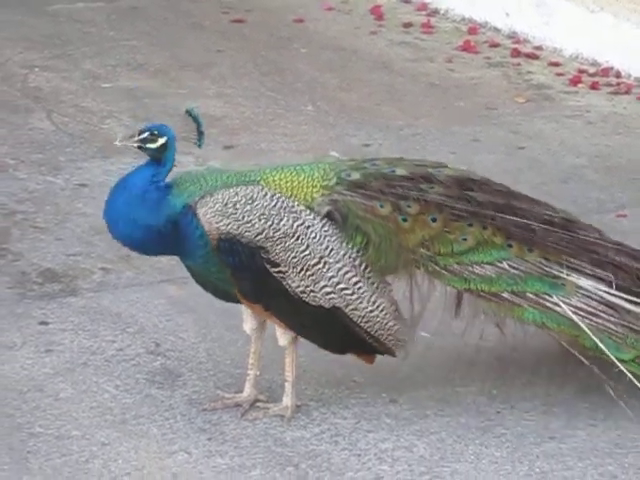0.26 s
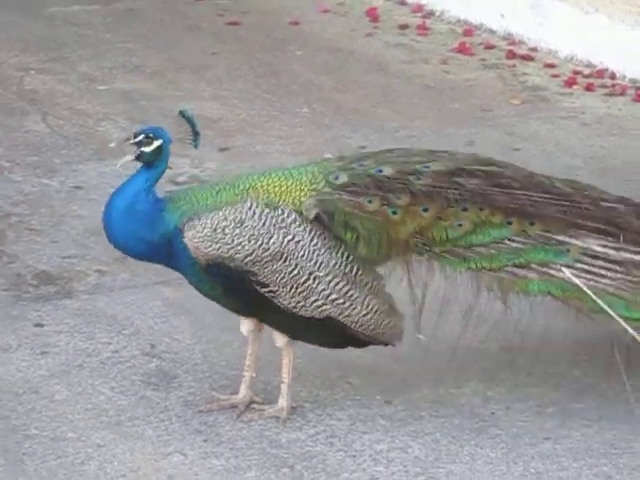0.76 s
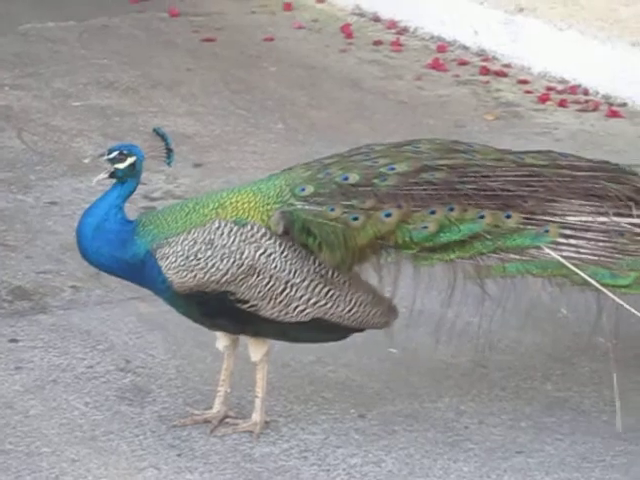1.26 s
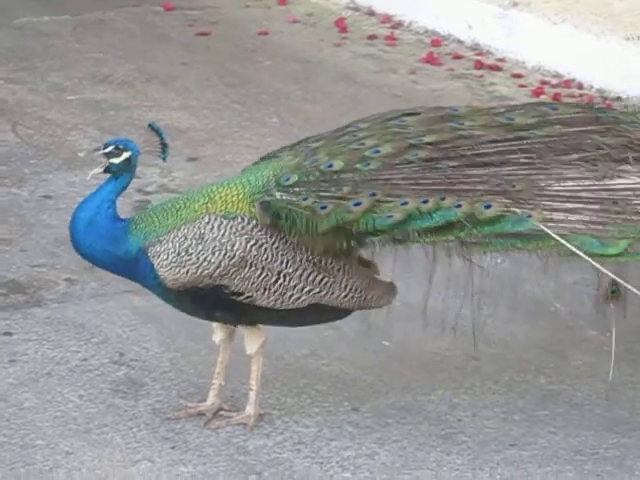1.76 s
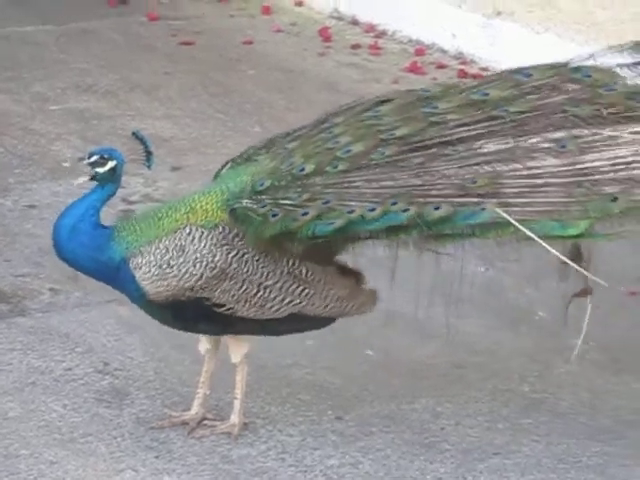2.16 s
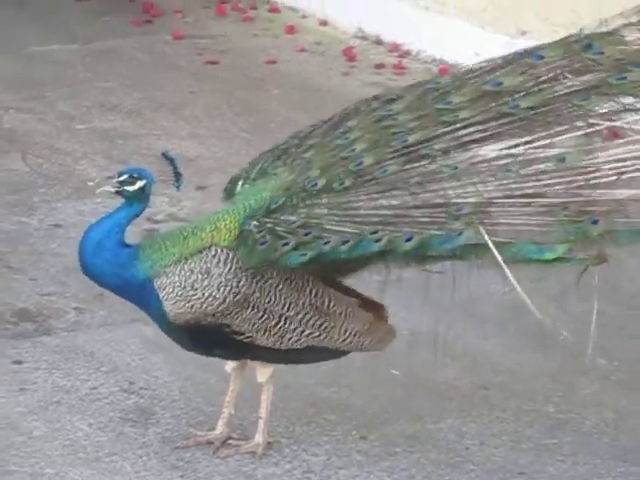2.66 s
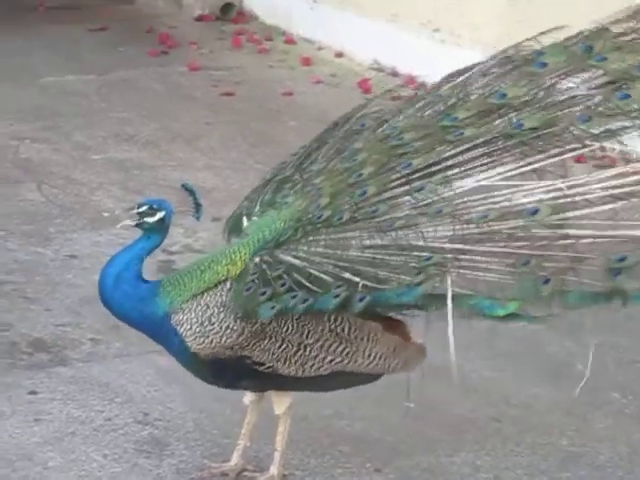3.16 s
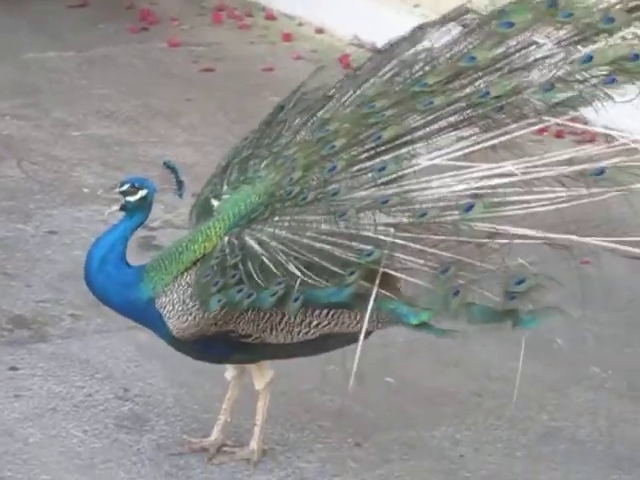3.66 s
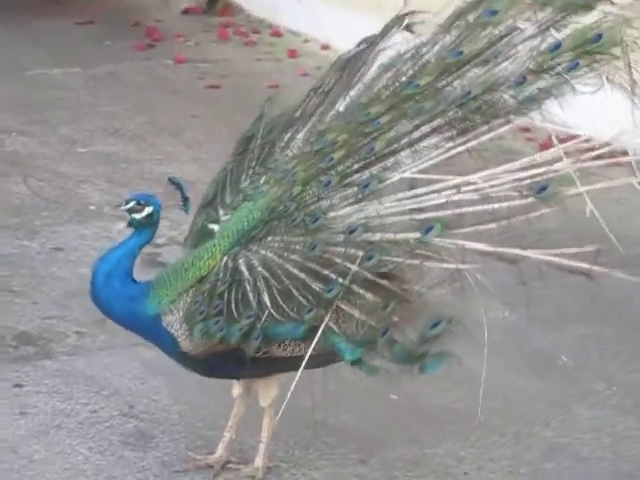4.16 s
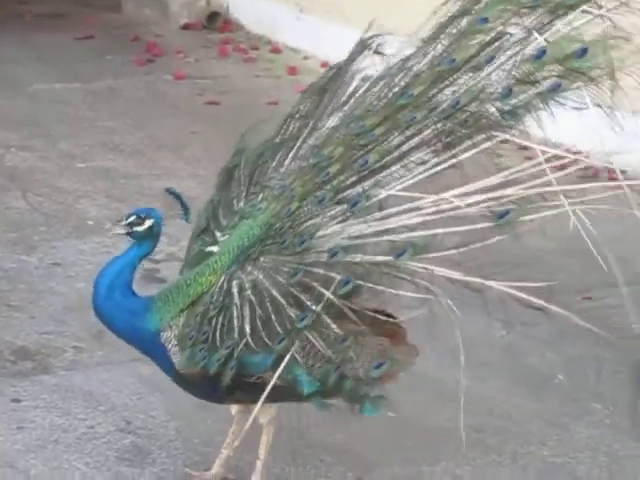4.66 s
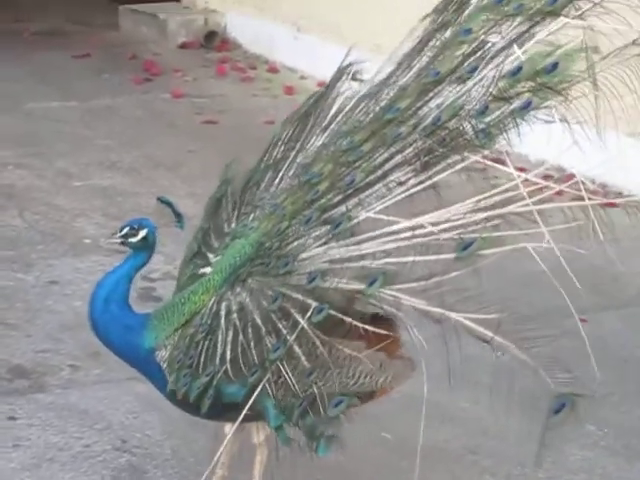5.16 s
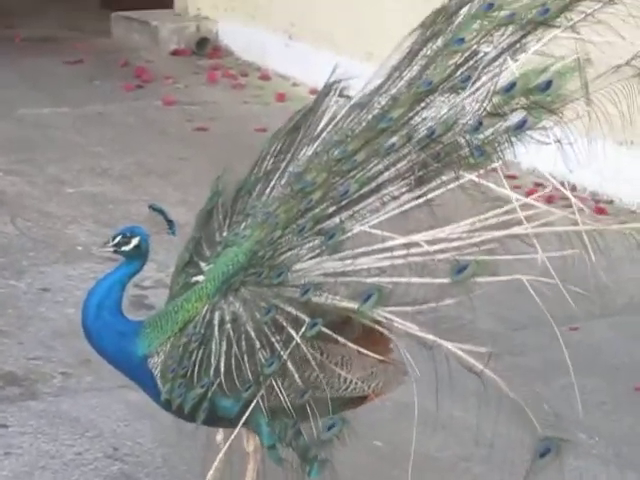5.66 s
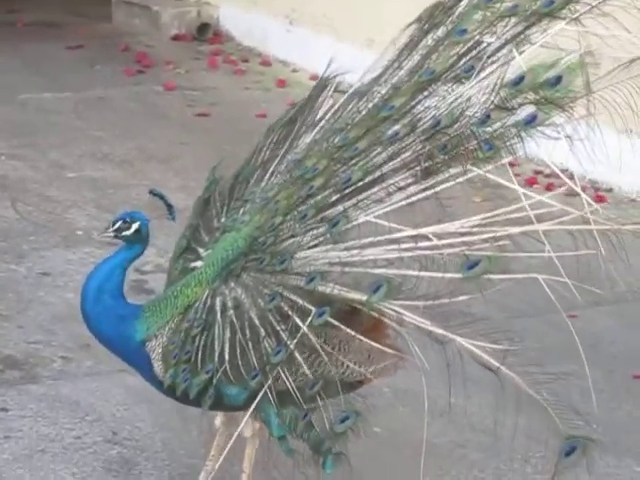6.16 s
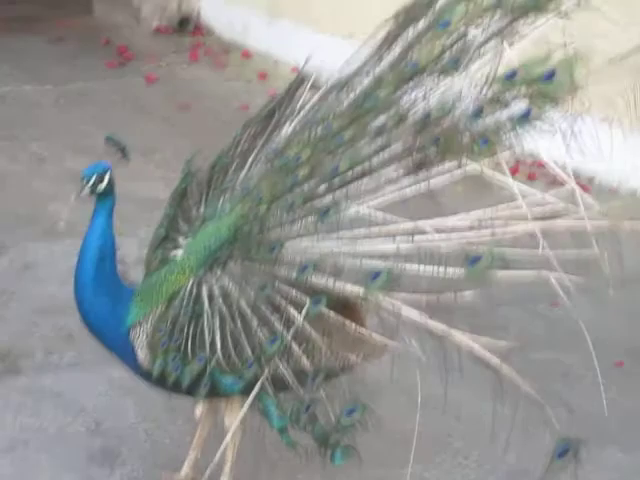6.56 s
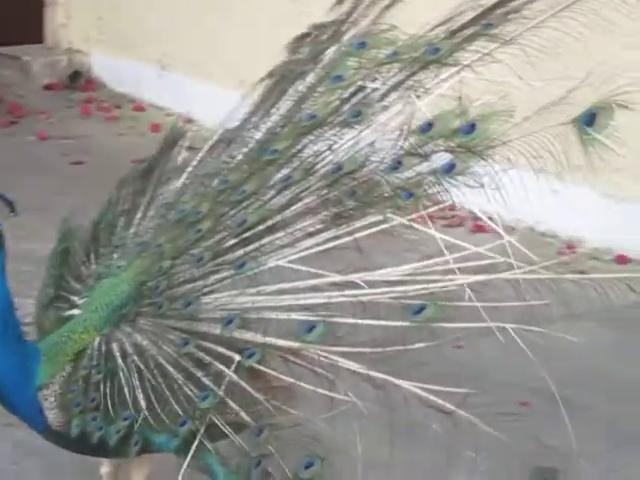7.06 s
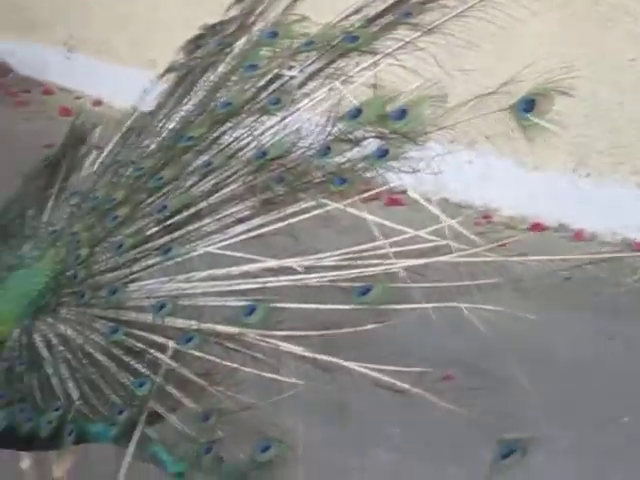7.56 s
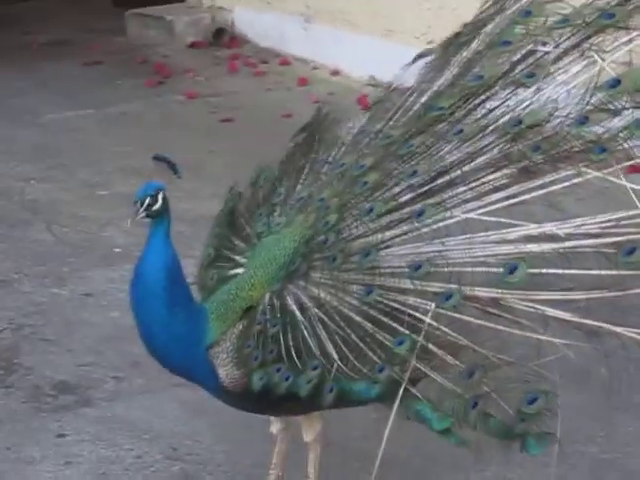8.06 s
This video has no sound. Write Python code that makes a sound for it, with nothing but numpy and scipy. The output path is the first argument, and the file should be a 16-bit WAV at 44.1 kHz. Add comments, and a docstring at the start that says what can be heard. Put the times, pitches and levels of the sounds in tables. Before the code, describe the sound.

Seven loud peacock cries ring out in quick succession in an echoing yard, then soft clicks, microphone bumps and distant birds.

```python
"""A walled concrete yard, one camera microphone, a peacock nearby and a faint machine hum throughout.
A small bird chirps and the peacock clucks once, then gives seven loud arching calls while raising his
train: a vibrating membrane, shaped by windpipe and beak. The ground and the walls answer; the camera's
gain control ducks under each call and lets the echo swell between them. Afterwards come a few dry
clicks, the small bird again, a hand bumping the camera and, last, peafowl far beyond the yard."""
import sys
import numpy as np
from scipy import signal
from scipy.fft import rfft, irfft, next_fast_len
from scipy.io import wavfile
from scipy.ndimage import map_coordinates

SR = 44100
rng = np.random.default_rng(int(sys.argv[2]) if len(sys.argv) > 2 else 0)


def waveform_to_disk(signal):
    """Save audio, clipped to [-1, 1], as 16-bit WAV at the path in sys.argv[1]."""
    frames = np.transpose(np.atleast_2d(signal))
    scaled = np.clip(frames, -1, 1) * 32767
    samples = np.round(scaled).astype(np.int16)
    wavfile.write(sys.argv[1], SR, samples)


N = 365883
TOP_HZ = 15800  # upper edge of the sound

# Levels in the tables are relative, ahead of the mix.
# the near peacock's calls: start/s, end/s, crest pitch/Hz, climb/share of that pitch, flatness/exponent,
# level/dB, blare at the crest/dB, harmonics above the fifth/dB, their tilt/dB per octave, attack/s
CALLS = [(0.306, 0.8, 841.2, 0.2, 1.85, 3.5, -1.5, 2.5, 5, 0.013),
         (1.007, 1.358, 817.7, .172, 1.7, 5.5, -1, 6.5, .5, 0.011),
         (1.545, 1.886, 806, 0.15, 1.64, 3.5, 0, 4.5, 2.5, .0075),
         (2.101, 2.489, 793.5, 0.15, 1.99, 3, 5, 2, 4.5, 0.0041),
         (2.708, 3.116, 784.4, 0.16, 2.3, 3.5, 11.5, 1.5, 5, 0.0032),
         (3.361, 3.794, 777.4, 0.16, 2.42, 3, 13, 0, 6, 0.0051),
         (4.08, 4.558, 776, 0.19, 3.02, 2.5, 12, -2, 7.5, 0.0058)]
# response of throat and open beak: f/Hz, level/dB
OPEN_BEAK = [(550, -19), (700, -4.5), (850, -2), (1250, 0.5), (1600, -6.5), (2100, -7), (3050, -3.5),
             (3450, -5.5), (4400, -18.5), (5800, -12.5), (7000, -14.5), (8300, -28), (11500, -25),
             (15500, -49)]
# steady notches in the sound at the microphone that the overtones glide through: f/Hz, width/Hz, depth/dB
NOTCHES = [(1562, 20, 14.5), (2248, 42.4, 15.5), (3294, 20, 46.5), (4720, 750, 0.5), (5450, 56, 20.5),
           (6310, 150, 13), (7500, 170, 3)]
# response of the half-closed beak: f/Hz, level/dB
HALF_CLOSED_BEAK = [(700, -3.5), (1400, 0), (2100, -19), (2800, -24.5), (4500, -29.5), (11000, -33.5)]
# reflections off the near walls: delay/s, strength/ratio
WALL_ECHOES = [(.024, 0.22), (.066, 0.17), (.086, 0.25), (.1, 0.14), (.124, 0.03), (.16, 0.019)]
# decay of the yard's diffuse tail: f/Hz, t60/s
YARD_DECAY = [(300, 0.72), (800, 1.053), (1500, 0.81), (2400, 0.88), (3300, 0.73), (5000, 0.6),
              (10000, 0.59), (15000, 0.62)]
# colour of that tail: f/Hz, level/dB
YARD_SPECTRUM = [(300, -38), (750, 0), (1400, 0), (2400, 4.5), (3100, -2), (4200, 9), (6000, 1.5),
                 (8000, 2), (9500, 9.5), (12000, -5.5), (15000, 1.5)]
# dry clicks: t/s, level/dB
CLICK_HITS = [(5.045, -31), (6.567, -43), (6.5842, -27.5), (6.664, -29.5), (7.775, -52)]
# modes that ring in a click: f/Hz, level/dB, t60/s
CLICK_RING = [(2470, 1, 0.013), (2910, 11, 0.01), (3750, 11, 0.011), (5030, -1, 0.012), (7100, 12, 0.0017)]
# hand on the camera: t/s, level/dB
HAND_BUMPS = [(7.124, -32), (7.174, -34), (7.219, -34), (7.259, -31), (7.338, -33), (7.364, -33),
              (7.424, -24.5), (7.589, -36), (7.639, -30.5)]
# the small bird's notes: start/s, length/s, first pitch/Hz, last pitch/Hz, level/dB
BIRD_NOTES = [(0, 0.017, 4700, 4540, -42), (0.144, 0.12, 3410, 3100, -56), (5.71, 0.084, 3580, 3180, -59),
              (5.934, 0.065, 3540, 3100, -55), (6.128, 0.059, 3710, 3160, -53),
              (6.317, .08, 3600, 3300, -59), (6.78, 0.077, 3360, 3150, -65),
              (7.372, 0.057, 4120, 4170, -56), (8.206, 0.038, 5190, 4800, -51)]
# peafowl beyond the yard: start/s, end/s, first pitch/Hz, last pitch/Hz, level/dB
FAR_CRIES = [(7.716, 7.831, 720, 850, -52), (7.945, 7.984, 760, 835, -49), (7.968, 8.031, 929, 941, -49),
             (8.099, 8.216, 767, 822, -51), (8.192, 8.301, 905, 946, -49)]
# their voices as heard from a distance: f/Hz, level/dB
FAR_SPECTRUM = [(800, 6), (1200, 12), (1700, 2.5), (2500, -9.5), (3500, -48), (6000, -42)]
# tones of the machine: f/Hz, level/dB
HUM_TONES = [(242.2, -61.5), (349.9, -56), (527.6, -54), (1061, -62.5)]
# distant outdoor rush: f/Hz, spectral level/dB
AIR_SPECTRUM = [(15, -50), (25, -18), (55, -10.5), (297, -14.5), (349, -12), (482, -12), (523, -14.5),
                (741, -15.5), (1080, -18.5), (1530, -22), (3260, -27.5), (4260, -31.5), (7910, -35),
                (15500, -45)]

CREST_AT = .51  # a call's pitch peaks at this share of its length


def peacock(jitter=0.00069, edge_jitter=0.021, onset_s=0.0091, break_s=0.013, air_db=-48, rasp_db=-3):
    """The near bird: clean arching calls, harsh for an instant as the membrane starts and stops."""
    voice, hiss_level = np.zeros(N), np.zeros(N)
    for start, end, crest_hz, climb, flatness, db, blare_db, upper_db, tilt_db, attack in CALLS:
        t = clock(end - start)
        tension = arch(t, climb, flatness)
        roughness = jitter + edge_jitter * (np.exp(-t / onset_s) + np.exp((t - t[-1]) / break_s))
        pitch = crest_hz * tension * (1 + roughness * wobble(700, len(t)))
        shape = lambda k: register(k, pitch, tension, blare_db) + brightness(k, t, upper_db, tilt_db)
        level = amp(db + effort(t, tension)) * fade(t, rise=attack, fall=0.0038) ** 2
        add(voice, start, level * syrinx(pitch, OPEN_BEAK, count=24, shape=shape, shimmer_db=3.5))
        add(hiss_level, start, level * (amp(air_db) + amp(rasp_db) * np.exp(-t / onset_s)))
    rasp = lambda hz: amp(along(OPEN_BEAK, hz)) / (1 + (500 / (hz + 1)) ** 4) / (1 + (hz / 6000) ** 4)
    return voice + hiss_level * noise(rasp)


def syrinx(pitch, throat, count, shape=lambda k: 0, shimmer_db=2):
    """A membrane's harmonics k, weighted by shape(k) dB, the throat and the notches at the microphone."""
    k = np.arange(1, count + 1)[:, None]
    hz, phase = k * pitch, 2 * np.pi * np.cumsum(pitch) / SR
    unsteadiness_db = shimmer_db * np.minimum(k / 6, 1)
    shimmer = unsteadiness_db * np.array([wobble(24.84, len(pitch)) for _ in k])
    notch_db = sum(depth / (1 + ((hz - centre) / width) ** 2) for centre, width, depth in NOTCHES)
    gain = amp(along(throat, hz) - notch_db + shape(k) + shimmer) * (hz < TOP_HZ)
    return np.sum(gain * np.sin(k * phase + rng.uniform(0, 2 * np.pi, k.shape)), axis=0)


def arch(t, climb, flatness, fall=.163, fall_span=.355, scoop_s=.014, drop_s=.016):
    """Pitch over crest pitch: the membrane scoops up, climbs, relaxes slowly and drops as it stops."""
    past_crest = t / t[-1] - CREST_AT
    rising = climb * np.maximum(-past_crest / CREST_AT, 0) ** flatness
    falling = fall * (1 - np.exp(-(np.maximum(past_crest, 0) / fall_span) ** 2))
    scoop = 0.047 * np.exp(-t / scoop_s)
    drop = 0.0893 * np.exp((t - t[-1]) / drop_s)
    return 1 - rising - falling - scoop - drop


def effort(t, tension, slack_db_per_octave=15.5, catch_db=9.5, surge_dip_db=4, fade_db=3):
    """A call's dB: it dips in the catch and the surge, follows the pitch and fades as air runs out."""
    catch = catch_db * bell(t, centre=0.026, width=0.022)
    spent = np.maximum(t / t[-1] - CREST_AT, 0) / (1 - CREST_AT)
    return slack_db_per_octave * np.log2(tension) - catch - surge_dip_db * surge(t) - fade_db * spent ** 2


def surge(t):
    """The brief push into the high harmonics after the voice catches, 0-1."""
    return bell(t, centre=0.07, width=0.015)


def register(k, pitch, tension, blare_db, ring_hz=2837, ring_width_hz=777, ring_db=11.5):
    """dB of harmonic k: the windpipe rings; the fourth leads when pure and gives way in the blare."""
    third, fourth, fifth, upper = k == 3, k == 4, k == 5, k > 5
    ring = ring_db / (1 + ((k * pitch - ring_hz) / ring_width_hz) ** 2)
    pure_at = np.where(np.gradient(tension) > 0, 0.95, 0.97)  # pure register going up, coming down
    pure = bell(tension, centre=pure_at, width=.015) * (4 * fourth - 8.5 * (third | fifth | upper))
    crest = bell(tension, centre=1, width=0.028)
    blare = crest * blare_db * (0.16 * third - fourth + 0.26 * upper)
    return ring + 4 * third + (0.5 - crest) * fifth + pure + blare


def brightness(k, t, upper_db, tilt_db, build_s=0.017, wane_s=0.033, flare_db=10):
    """dB of the high harmonics k: they flare in the surge, grow in the call and are dull at its ends."""
    edges = np.exp(-t / build_s) + np.exp((t - t[-1]) / wane_s)
    db_per_octave = tilt_db + 4 * (t / t[-1] - .5) - 12.5 * edges
    octaves_above_fifth = np.log2(np.maximum(k / 5, 1))
    return upper_db * (k > 5) + flare_db * surge(t) * (k > 4) + db_per_octave * octaves_above_fifth


def cluck(db=-17, pitch_hz=690, hold_s=.007, decay_s=0.0062):
    """One short honk through a half-closed beak, before the calls."""
    out, t = np.zeros(N), clock(.04)
    tone = syrinx(pitch_hz * (1 + .02 * wobble(400, len(t))), HALF_CLOSED_BEAK, count=16)
    decay = np.minimum(1, np.exp((hold_s - t) / decay_s))
    add(out, .0205, amp(db) * tone * fade(t, rise=0.00072, fall=0.0092) * decay)
    return out


def over_ground(x, delay_s=0.0010363, bounce=0.27, side_delay_s=0.0032, side_bounce=0.11):
    """Direct sound and bounces off concrete meet at the microphone, cutting notches in the spectrum."""
    echo = lambda hz, s: np.exp(-2j * np.pi * hz * s)
    return filtered(x, lambda hz: 1 + bounce * echo(hz, delay_s) + side_bounce * echo(hz, side_delay_s))


def past_train(x, low_hz=3900, high_hz=7000, start_db=2.5, screen_db_per_s=1.5):
    """The rising train screens the walls ever more from a treble band; low harmonics pass through."""
    treble = filtered(x, lambda hz: 1 / (1 + (hz / high_hz) ** 8) - 1 / (1 + (hz / low_hz) ** 8))
    treble_gain = amp(start_db - screen_db_per_s * np.arange(N) / SR)
    return x + treble * (treble_gain - 1)


def yard(x, tail_db=-11, walls_db=-1, build_s=.07):
    """Single echoes off the walls, and a diffuse tail that builds up and dies faster in the treble."""
    hz, t, spectrum = signal.stft(rng.standard_normal(3 * SR // 2), SR, nperseg=256)
    build = 1 - np.exp(-t / build_s)
    decay = amp(along(YARD_SPECTRUM, hz)[:, None] - 60 * t / along(YARD_DECAY, hz)[:, None])
    response = signal.istft(spectrum * decay * build, SR, nperseg=256)[1]
    response *= amp(tail_db) / np.linalg.norm(response)
    for delay, strength in WALL_ECHOES:
        response[round(delay * SR)] += strength * amp(walls_db)
    return signal.fftconvolve(x, response)[:N]


def clicks(crack=0.58, crack_t60=0.02):
    """Dry clicks nearby, perhaps stiff quills: a crack and a few quickly damped modes."""
    out, t = np.zeros(N), clock(.04)
    for start, db in CLICK_HITS:
        ring = sum(amp(level + rng.normal(0, 0.34) - 60 * t / t60) * np.sin(2 * np.pi * hz * t)
                   for hz, level, t60 in CLICK_RING)
        snap = crack * amp(-60 * t / crack_t60) * rng.standard_normal(len(t))
        add(out, start, amp(db - 2.5) * (ring + snap) * fade(t, rise=0.00047, fall=.005))
    return out


def camera_bumps(trim_db=-4, t60=0.11, corner_hz=170):
    """Handling noise right at the microphone: soft low thuds as the hand shifts on the camera."""
    push, t = np.zeros(N), clock(.15)
    for s, db in HAND_BUMPS:
        add(push, s - .004, amp(db + trim_db - 60 * t / t60) * fade(t, rise=0.0075, fall=.01))
    return push * noise(lambda hz: hz / (hz + 40) / (1 + (hz / corner_hz) ** 3))


def small_bird():
    """Thin gliding whistles, faint at the microphone."""
    out = np.zeros(N)
    for start, length, first_hz, last_hz, db in BIRD_NOTES:
        t = clock(length)
        pitch = np.linspace(first_hz, last_hz, len(t)) * (1 + 0.01 * wobble(250, len(t)))
        add(out, start, amp(db) * sine(pitch) * fade(t, rise=.025, fall=0.0042))
    return out


def far_peafowl(jitter=0.025):
    """Rising, wavering cries from beyond the yard."""
    out = np.zeros(N)
    for start, end, first_hz, last_hz, db in FAR_CRIES:
        t = clock(end - start)
        glide = first_hz + (last_hz - first_hz) * np.sin(np.pi * t / t[-1] / 2)
        pitch = glide * (1 + jitter * wobble(201, len(t)))
        cry = unit(syrinx(pitch, FAR_SPECTRUM, count=6))
        add(out, start, amp(db) * cry * fade(t, rise=0.02, fall=0.013))
    return out


def outdoor_air(db=-47):
    """A distant rush whose level drifts a little."""
    return noise(lambda hz: amp(along(AIR_SPECTRUM, hz))) * amp(db + .4 * wobble(4, N))


def machine_hum(drift_db=1.7, waver=.002):
    """A faint machine: a few tones, each slightly unsteady in level and pitch."""
    return sum(amp(db + drift_db * wobble(7.6, N)) * unit(sine(hz * (1 + waver * wobble(22.12, N))))
               for hz, db in HUM_TONES)


def gain_control(x, top_db, attack_s, release_db_per_s, window_s):
    """The camera turns down whatever exceeds top_db, then recovers at a steady rate."""
    def smooth(v, seconds):
        pole = np.exp(-1 / (seconds * SR))
        return signal.lfilter([1 - pole], [1, -pole], v)
    level_db = 10 * np.log10(smooth(x ** 2, window_s) + 1e-12)
    excess_db = np.maximum(level_db - top_db, 0)
    ramp = release_db_per_s * np.arange(N) / SR
    held_db = np.maximum.accumulate(excess_db + ramp) - ramp
    return x * amp(-smooth(held_db, attack_s))


def amp(db):
    """Decibels to gain."""
    return 10 ** (np.asarray(db) / 20)


def unit(x):
    """Scale to rms 1."""
    return x / np.sqrt(np.mean(x ** 2) + 1e-20)


def along(points, hz):
    """Interpolate (f/Hz, value) points on a log frequency axis."""
    f, v = np.transpose(points)
    return np.interp(np.log(hz + 1), np.log(f + 1), v)


def clock(length):
    """Sample times of a stretch of sound."""
    return np.arange(int(length * SR)) / SR


def bell(x, centre, width):
    """A Gaussian hump of height 1."""
    return np.exp(-((x - centre) / width) ** 2)


def sine(pitch):
    """A pure tone that follows a pitch curve in Hz."""
    return np.sin(2 * np.pi * np.cumsum(pitch) / SR)


def wobble(rate, size):
    """A smooth random curve, rate knots a second."""
    knots = rng.standard_normal(int(size * rate / SR) + 4)
    return map_coordinates(knots, [np.arange(size) * rate / SR])


def fade(t, rise, fall):
    """A gate with sloping ends."""
    return np.clip(t / rise, 0, 1) * np.clip((t[-1] - t) / fall, 0, 1)


def add(track, s, sound):
    """Mix a sound in at s seconds."""
    part = track[max(round(s * SR), 0):][:len(sound)]
    part += sound[:len(part)]


def filtered(x, response):
    """Pass x through a complex frequency response."""
    m = next_fast_len(N + SR // 2)
    return irfft(rfft(x, m) * response(np.fft.rfftfreq(m, 1 / SR)), m)[:N]


def noise(response):
    """Noise of rms 1, coloured by a frequency response."""
    return unit(filtered(rng.standard_normal(N), response))


def scene():
    """Near sounds with the yard's answer, far cries with more echo; all reach one microphone."""
    calls, honk, far = amp(-9) * peacock(), cluck(), far_peafowl()
    whistles, ticks = small_bird(), clicks()
    direct = over_ground(calls) + honk + amp(7.5) * far + whistles + ticks
    to_walls = past_train(calls) + amp(1.5) * honk + amp(12) * far + amp(-4) * whistles + amp(-19) * ticks
    mono = direct + yard(to_walls) + camera_bumps() + outdoor_air() + machine_hum()
    return np.array([mono, mono])


def record(dry, ceiling=.66):
    """In the camera a fast limiter catches onsets, a slower control levels calls, peaks are rounded."""
    caught = gain_control(dry[0], top_db=-6.5, attack_s=.0004, release_db_per_s=62, window_s=.0003)
    levelled = gain_control(caught, top_db=-19, attack_s=.022, release_db_per_s=111, window_s=0.007)
    rounded = levelled / (1 + np.abs(levelled / ceiling) ** 8) ** (1 / 8)
    out = filtered(rounded, lambda hz: hz < TOP_HZ)
    return np.array([out, out])


dry = scene()
out = record(dry)
waveform_to_disk(out)
```